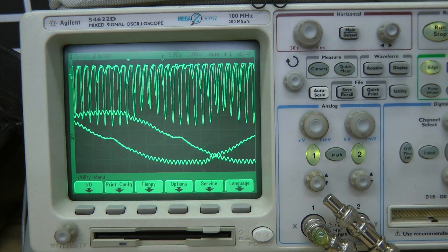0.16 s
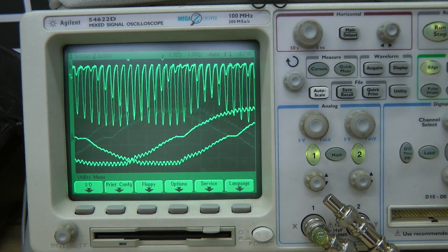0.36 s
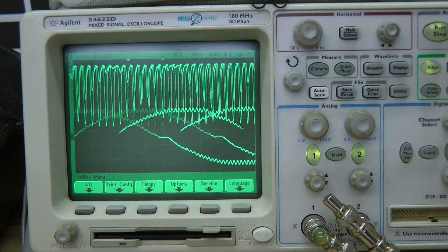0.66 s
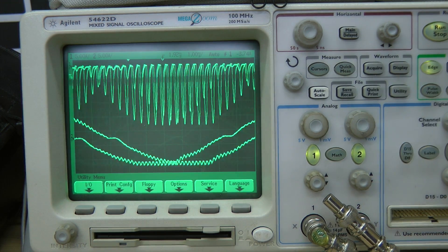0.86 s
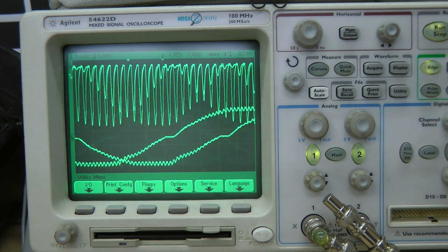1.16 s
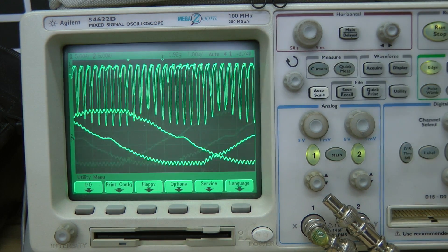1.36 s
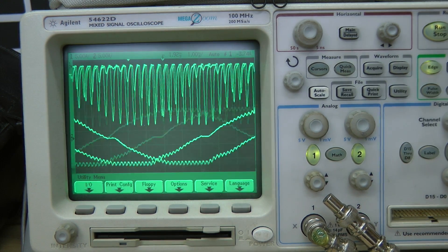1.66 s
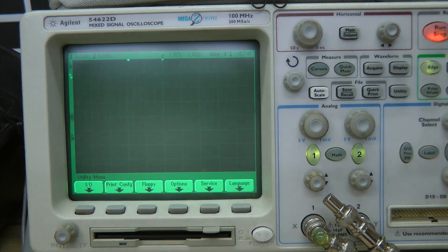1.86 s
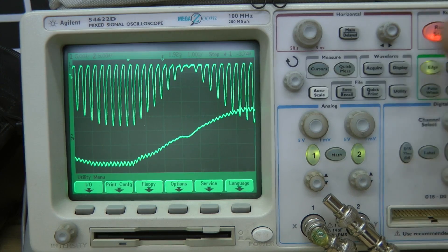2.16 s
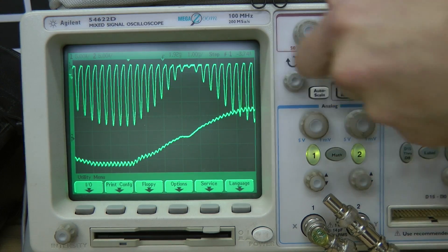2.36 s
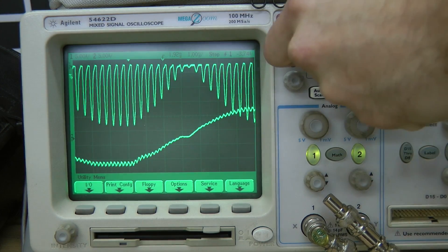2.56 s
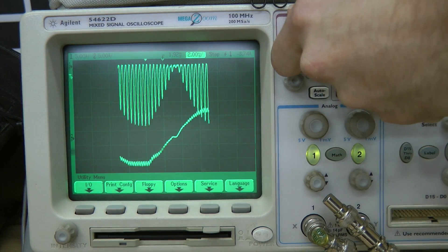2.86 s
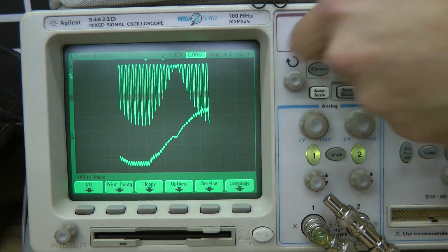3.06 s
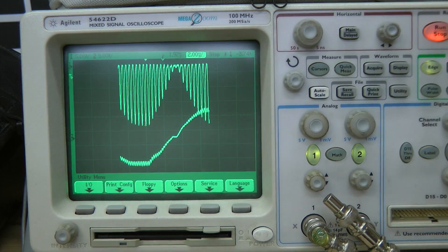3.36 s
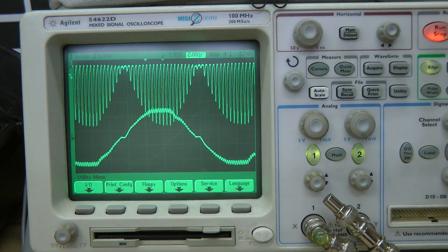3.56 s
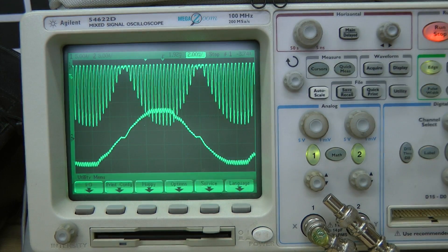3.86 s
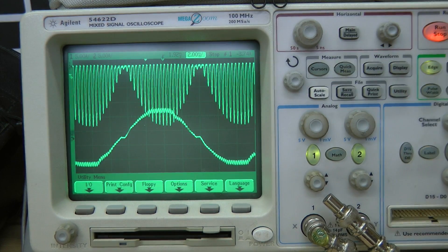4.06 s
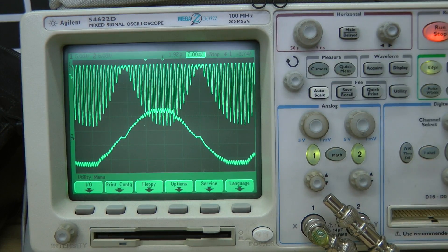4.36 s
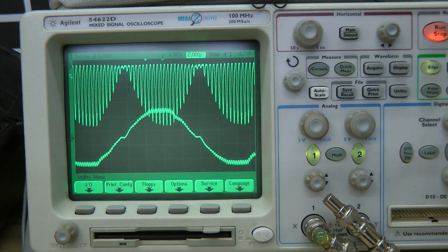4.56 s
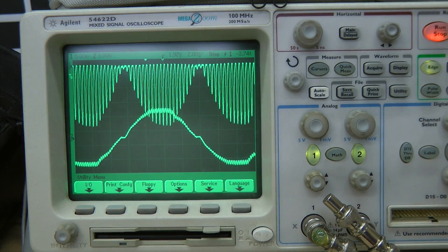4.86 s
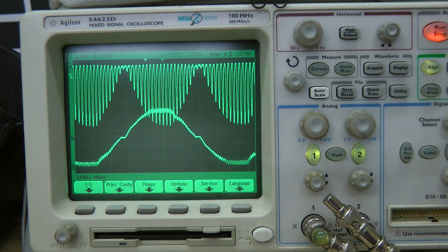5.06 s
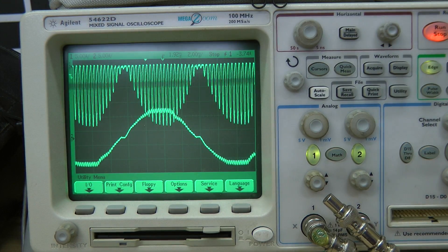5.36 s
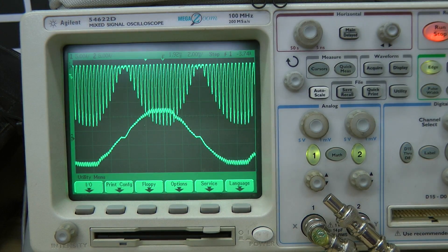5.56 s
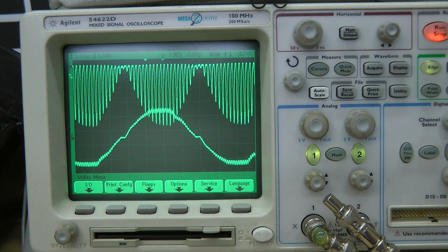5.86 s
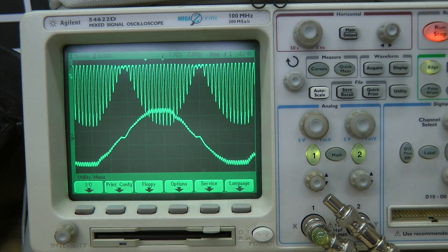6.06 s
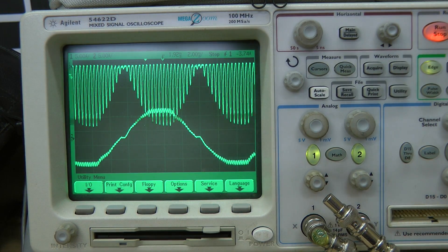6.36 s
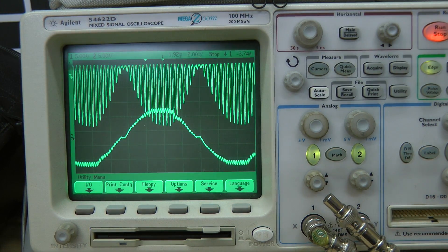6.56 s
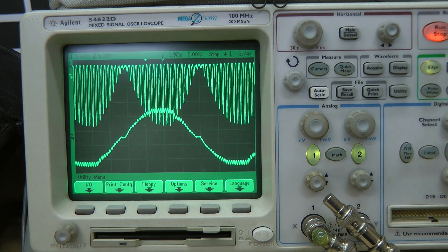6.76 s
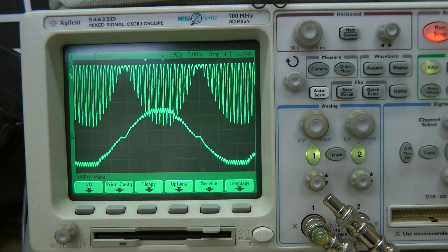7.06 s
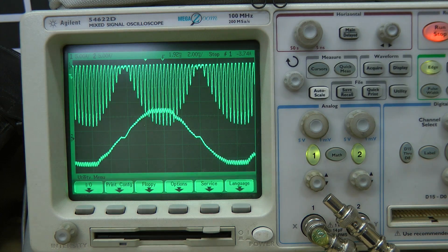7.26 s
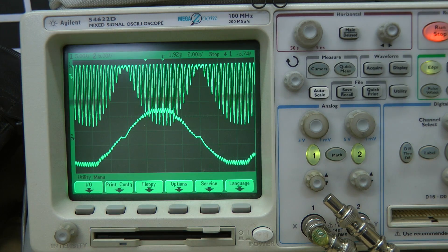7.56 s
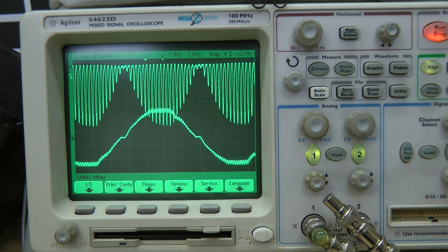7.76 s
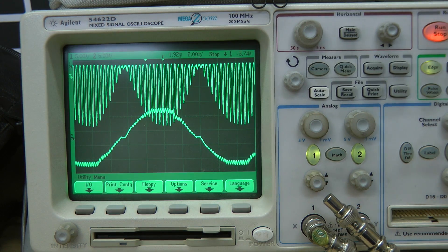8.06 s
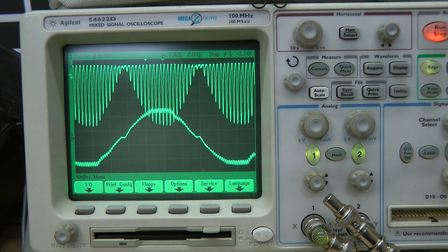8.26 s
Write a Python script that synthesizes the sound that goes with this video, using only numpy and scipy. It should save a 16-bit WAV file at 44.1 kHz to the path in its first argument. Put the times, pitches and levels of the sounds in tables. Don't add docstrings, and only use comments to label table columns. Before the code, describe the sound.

Close stereo pickup of a small high-speed blower motor: a quick rising whine and burst of air, a brief dip in loudness, then a long steady piercing tone with buzzing edges and a broad airy roar. Near the end it is switched off, and the pitch falls steadily through wavering room reflections while the air darkens and a soft thump barely shows.

```python
import sys
import numpy as np
from scipy import signal
from scipy.io import wavfile
from scipy.ndimage import uniform_filter1d

SR = 44100
rng = np.random.default_rng(int(sys.argv[2]) if len(sys.argv) > 2 else 0)


def wav_out(sig):
    wavfile.write(sys.argv[1], SR, np.round(np.clip(np.atleast_2d(sig).T, -1, 1) * 32767).astype(np.int16))


def volts(x):
    e = np.asarray(x, float) / 20
    return 10 ** e


N = 371423

OFF_S = 6.462
STEP = 64
# (frequency [Hz], left over right [dB])
LEAN = [(60, 6), (110, 0), (200, 0.5), (380, -3.5), (700, -7), (1290, -6), (2380, -4), (4400, 0),
        (8120, -1.5), (15000, 0)]
# (frequency [Hz], left leads by [radians])
LEAD = [(0, -0.32), (860, -0.71), (1210, 0.31), (1460, -0.37), (2410, -0.52), (3880, 0.0), (7410, -0.0),
        (7670, 0.92), (8010, 0.34), (10600, 0.61), (11200, 0.73), (11500, 0.56), (12000, 1), (15200, 0.2)]


def evened(x):
    return x / np.sqrt(np.mean(x ** 2) + 1e-20)


def read(points, hz):
    f, value = np.transpose(points)
    return np.interp(np.log(hz + 1), np.log(f + 1), value)


def humps(modes, hz):
    return sum(db / (1 + (2 * (hz - f) / width) ** 2) for f, width, db in modes)


def drift(t, rate_hz):
    coarse = np.linspace(0, t[-1], 2000)
    slow = 0
    for f in np.geomspace(rate_hz / 15, rate_hz, num=20):
        slow = slow + np.sin(2 * np.pi * (f * coarse + rng.random())) / np.sqrt(f)
    return np.interp(t, coarse, evened(slow))


def speed(t):
    # (time [s], shaft speed [turns/s])
    run_up = [(0, 1000), (.05, 1068), (.13, 1154), (.17, 1190), (.21, 1220), (.25, 1236), (.33, 1257),
              (.41, 1270), (.53, 1277), (.65, 1282), (1.2, 1282.7), (2.4, 1283), (2.75, 1282.1),
              (3.6, 1282.1), (4.8, 1282.2), (5.4, 1282.7), (6.462, 1283)]
    drag_s_per_s, friction_s_per_s4 = .002982, .0000147
    s, hz = np.transpose(run_up)
    coast = np.maximum(t - OFF_S, 0)
    powered_period = np.interp(t, s, 1 / hz)
    return 1 / (powered_period + drag_s_per_s * coast + friction_s_per_s4 * coast ** 4)


def octaves_down(shaft):
    return np.log2(shaft.max() / shaft)


def tone(hz, level_db, lean_db):
    at, steps = np.arange(N) / STEP, np.arange(len(hz))
    turns = np.cumsum(hz) * STEP / SR + rng.random()
    lead_turns = read(LEAD, hz) / (2 * np.pi)
    out = np.empty((2, N), np.float32)
    for port, way in zip(out, (.5, -.5)):
        angle = np.interp(at, steps, turns + way * lead_turns) % 1 * (2 * np.pi)
        gain = np.sqrt(2) * volts(level_db + way * lean_db) * (hz < 16500)
        port[:] = np.interp(at, steps, gain) * np.sin(angle.astype(np.float32))
    return out


def room(x, t60=0.18, apart=0.48):
    size = SR // 3
    signs = rng.choice([-1., 1.], (3, size))
    common, left, right = signs * (rng.random((3, size)) < 1 / 20)
    lag = np.arange(size) / SR
    tail = (common + apart * np.array([left, right])) * volts(-60 * lag / t60) * (lag > .002)
    return signal.oaconvolve(x, tail / np.linalg.norm(tail[0]), axes=1)[:, :N]


def whine():
    # (shaft order, ripple multiple, level [dB], left over right [dB], wavering [dB])
    motor = [(0, 1, -70, 0, 1.8), (2, 0, -55, -2, 2.5), (3, 0, -56, -1, 2.5), (4, 0, -43.5, 0, 1.1),
             (5, 0, -56.5, 0, 2.5), (6, 0, -54, -1, 2.5), (7, 0, -49, -1.5, 1.5), (8, 0, -56, 0, 2.5),
             (2, 1, -61, -2, 3), (5, 1, -63, 0, 3), (6, 1, -56, -1, 3), (9, -1, -42.5, 0, 2),
             (9, 1, -35, 0, 1.2), (9, 2, -56, 0, 2.5)]
    # (time [s], blade left over right [dB], blade level
    # [dB], unbalance level [dB])
    sway = [(0, -3, 3, 5), (.42, 3, -1, 8), (.75, 3, 1.5, -2), (1.25, -0.5, 3, -1.5), (1.75, -2, 3, -1),
            (2.25, -1.5, 2, 1.5), (2.75, 2, 1, 1.5), (3.5, 0.5, 0.3, 1), (4.5, 1, 1.3, 1.5),
            (5.5, 1, 1.1, -5), (6.4, 0.5, 2, -4), (6.6, -1, -3, 2)]
    # (frequency [Hz], width [Hz], level [dB])
    pass_path = [(1460, 870, -23), (1740, 69, 11.5), (1860, 56, -16), (2071, 32, -25), (2130, 47, 6.5),
                 (5050, 970, 0.5), (8770, 1500, -0.5), (10600, 74, 8), (11225, 520, -3)]
    # (frequency [Hz], width [Hz], level [dB])
    octave_path = [(2620, 90, 5.5), (2800, 360, -3), (3560, 130, 8.5), (3850, 150, 5), (4300, 300, -7),
                   (6100, 300, 5), (14500, 1700, -3)]
    # (frequency [Hz], width [Hz], level [dB])
    wobble_path = [(231, 35, 10.7), (420, 64, 12.7), (532, 40, 15), (582, 59, 21), (660, 60, 15),
                   (1160, 40, 11), (1217, 27, 11), (1282, 73, 11.3)]
    ripple_hz = 119.85
    t = np.arange(0, N + STEP, STEP) / SR
    shaft = speed(t)
    s, *columns = np.transpose(sway)
    sway_db, swell_db, unbalance_db = (np.interp(t, s, c) for c in columns)

    pass_db = -29.5 + swell_db - 0.5 * octaves_down(shaft) + humps(pass_path, 9 * shaft)
    octave_db = -48 + humps(octave_path, 18 * shaft)
    third_db = octave_db - 5 - 14 + humps([(6260, 2500, 14)], 27 * shaft)
    out = 0
    for order, db in zip((9, 18, 27), (pass_db, octave_db, third_db)):
        lean_db = read(LEAN, order * shaft) + sway_db * (order == 9)
        out = out + tone(order * shaft, db + 0.73 * drift(t, 30), lean_db)

    wobble_db = -66.5 + unbalance_db + humps(wobble_path, shaft)
    wobble = tone(shaft, wobble_db + 0.78 * drift(t, 30), read(LEAN, shaft))

    powered_db = -1500 * np.maximum(t - OFF_S, 0) - 40 * np.maximum(.33 - t, 0)
    for order, ripple, db, lean_db, waver_db in motor:
        hz = round(order) * shaft + round(ripple) * ripple_hz
        out += tone(hz, db + powered_db + waver_db * drift(t, 50), lean_db + sway_db * (order == 9))

    gliding = np.clip(abs(np.gradient(np.log(shaft), t)) / .35, 0, 1)
    gliding = np.interp(np.arange(N) / STEP, np.arange(len(t)), gliding)
    return wobble + out * volts(-2.5 * gliding) + volts(-0.5) * room(out * gliding)


def air():
    # (frequency [Hz], level [dB per Hz])
    rush = [(18, -70), (30, -55), (114, -26), (300, -20.5), (500, -13.5), (876, -9.5), (1050, -11.5),
            (1730, -12), (1970, -14.5), (5050, -9.5), (6730, -8), (11300, -9), (12300, -13.5), (15600, -16)]
    # (frequency [Hz], width [Hz], level [dB])
    housing = [(379, 64, 4.5), (238, 68, 3), (470, 24, -0.5), (510, 43, 3.5), (555, 76, 8), (652, 35, 5),
               (780, 237, 5), (1090, 160, -8), (1177, 84, 10), (1300, 32, 1), (1496, 57, 6), (1746, 83, 9),
               (2050, 81, -0.5), (2490, 30, -6), (2470, 32, 3.5), (2675, 290, 6), (2994, 43, 5.5),
               (3556, 175, 6), (4144, 300, 4), (5020, 1100, 5.5), (6192, 68, 9), (6800, 300, -2),
               (7700, 200, 2.5), (8940, 760, 2)]
    # (frequency [Hz], width [Hz], level [dB])
    coasting = [(142, 46, 2), (235, 81, 2.5), (358, 52, 5), (573, 146, 6), (803, 104, -8), (1046, 93, 15),
                (1240, 220, -1), (1560, 140, 6), (1940, 560, -4.5), (2620, 360, 1.5), (3640, 300, -1),
                (6420, 600, 3.5), (11300, 2300, -1)]
    # (shaft order, width [Hz], level [dB])
    skirts = [
        (9, 450, 4),
        (4, 140, 1.5),
    ]
    # (time [s], level [dB])
    air_level = [(0, 5.5), (.21, 3), (.72, 0), (1.24, -0.5), (1.43, 1), (1.88, 0.4), (2.65, 0.5), (2.84, 1.5),
                 (3.7, 1.6), (5, 2.06), (5.46, 0.8), (5.88, 2.5), (6.3, 1), (6.97, -0.5), (7.3, -0.9), (7.62, 2),
                 (8.04, -1.7), (8.42, -5)]
    # (centre [Hz], share of level change, slope [dB per octave slowed], # bend [dB per
    air_parts = [
        (216, .9, -4, 2.5),
        (590, 0.89, -0.25, 0.05),
        (3770, 1.03, 4.5, -2),
        (13500, 0.93, -1, -2),
    ]
    # (frequency [Hz], left-right likeness [-1 to 1])
    likeness = [(40, -.9), (70, -0.93), (130, 0.86), (290, 0.96), (500, 0.91), (800, 0.58), (1220, 0.098),
                (2010, 0.61), (3330, 0.9), (5500, 1), (9080, 0.87), (15000, 0.79)]
    frames, hz = N // 512 + 5, np.fft.rfftfreq(2048, 1 / SR)
    t = np.arange(frames) * 512 / SR
    a, b, c, d, patches = np.ascontiguousarray(rng.standard_normal((frames, 1025, 5)).T)
    patches = uniform_filter1d(patches, size=20, axis=0)
    patches = evened(uniform_filter1d(patches, size=6, axis=1))
    echoes = evened(uniform_filter1d(rng.standard_normal(len(hz)), size=2))
    colour_db = read(rush, hz) + humps(housing, hz) + 2.3 * echoes * np.clip(hz / 2500, .3, 1)

    shaft = speed(t)
    slowed = np.clip((1 - shaft / shaft.max()) / 0.84, 0, 1)
    moving_db = np.outer(humps(coasting, hz), slowed)
    moving_db += humps([(k * shaft, width, db) for k, width, db in skirts], hz[:, None])

    air_level_db = np.interp(t, *np.transpose(air_level))
    down = octaves_down(shaft) * (t > OFF_S)
    change_db = np.array([share * air_level_db + slope * down + bend * down ** 2
                          for _, share, slope, bend in air_parts])
    centres_hz = np.transpose(air_parts)[0]
    shares = np.array([read(list(zip(centres_hz, row)), hz) for row in np.eye(len(centres_hz))])
    field_db = colour_db[:, None] + moving_db + shares.T @ change_db
    field_db = field_db + 0.88 * patches + 0.13 * drift(t, 10)

    same = np.clip(read(likeness, hz), -1, 1)[:, None]
    z = a + 1j * b
    other = same * z + np.sqrt(1 - same ** 2) * (c + 1j * d)
    side = (volts(read(LEAN, hz) / 2) * np.exp(.5j * read(LEAD, hz)))[:, None]
    pair = np.array([z * side, other / side]) * volts(field_db)
    noise = signal.istft(pair, nperseg=2048, noverlap=1536)[1][:, :N]
    return volts(-31.5) * evened(noise)


def thud():
    # (time [s], pitch [Hz], peak level [dB], 60 dB decay time [s])
    knock = (7.475, 125., -48., .1)
    s, hz, db, t60 = knock
    lag = np.maximum(np.arange(N) / SR - s, 0)
    soft_start = 1 - np.exp(-lag / .004)
    return volts(db - 60 * lag / t60) * np.sin(2 * np.pi * hz * lag) * soft_start


def scene():
    hiss = volts(-66.5) * rng.standard_normal((2, N))
    return whine() + air() + thud() + hiss


def roll_off(x):
    return signal.sosfilt(signal.butter(12, 15700, fs=SR, output="sos"), x)


def record(dry):
    # (time [s], depth [dB], recovery [s])
    duck = (.166, 6.5, .03)
    s, depth_db, recovery = duck
    lag = np.maximum(np.arange(N) / SR - s, 0)
    dip = (1.5 - np.exp(-lag / 0.0046)) * np.exp(-lag / recovery)
    return roll_off(dry * volts(-depth_db * dip))


dry = scene()
out = record(dry)
wav_out(out)
```